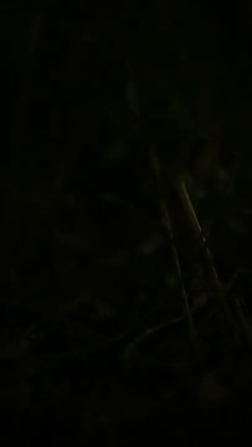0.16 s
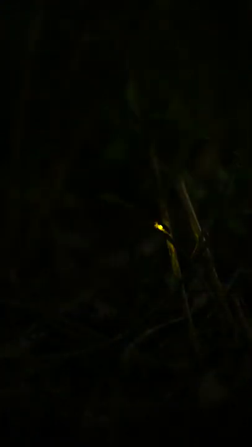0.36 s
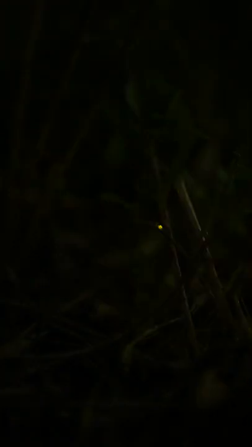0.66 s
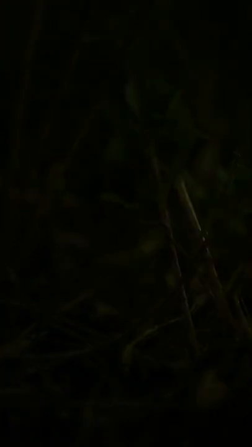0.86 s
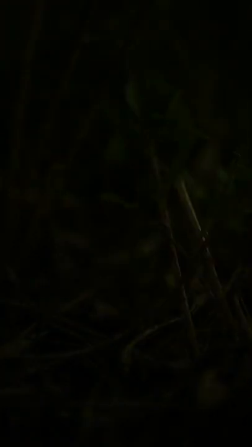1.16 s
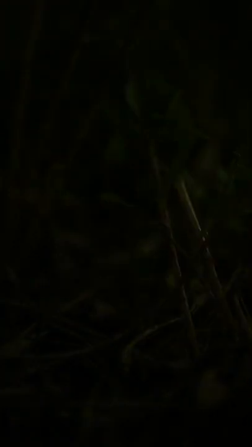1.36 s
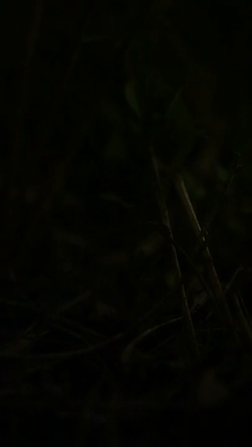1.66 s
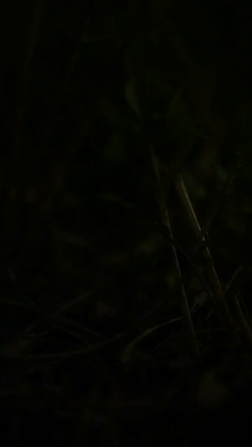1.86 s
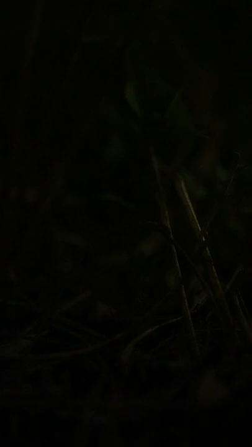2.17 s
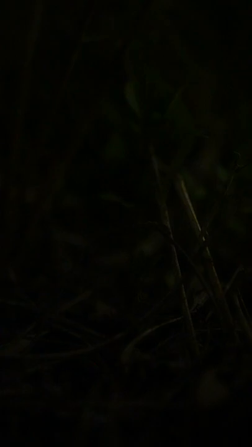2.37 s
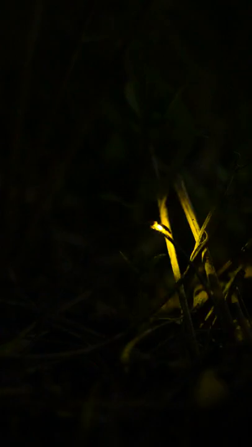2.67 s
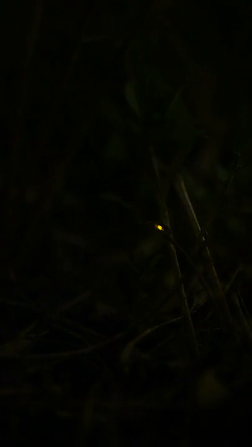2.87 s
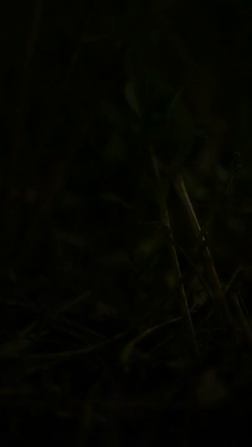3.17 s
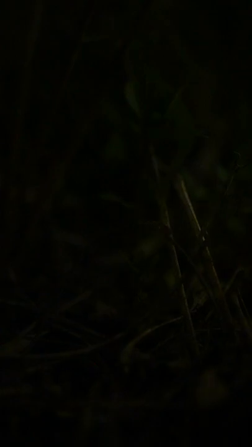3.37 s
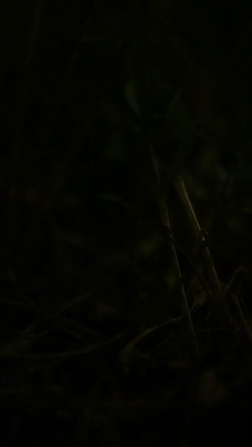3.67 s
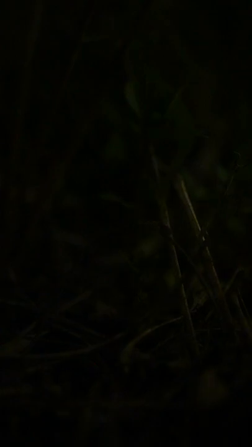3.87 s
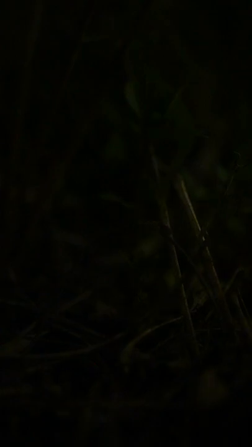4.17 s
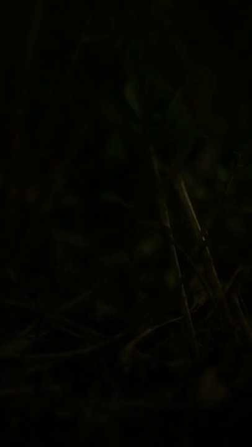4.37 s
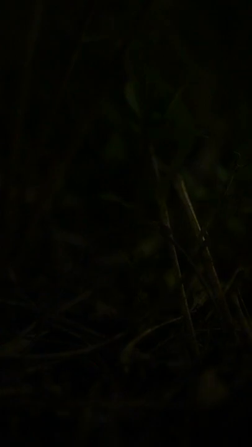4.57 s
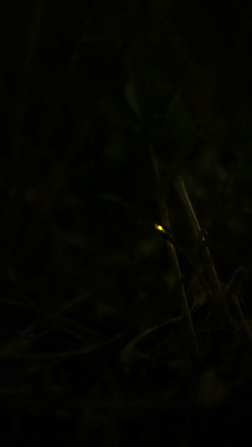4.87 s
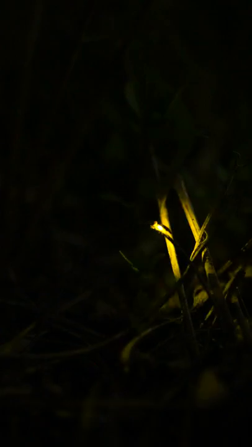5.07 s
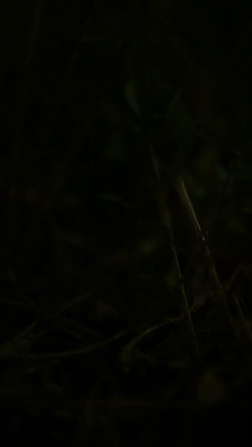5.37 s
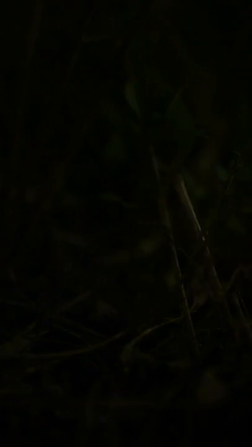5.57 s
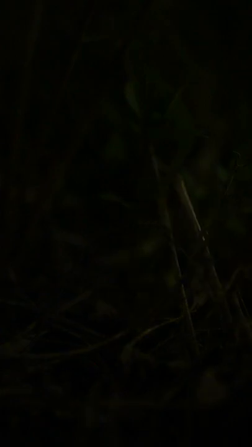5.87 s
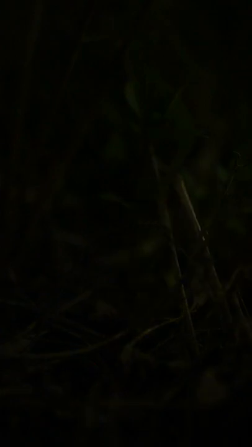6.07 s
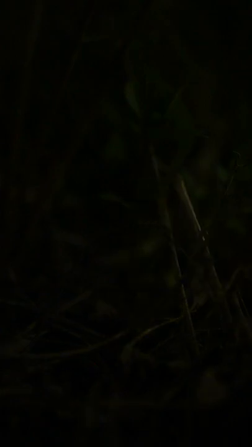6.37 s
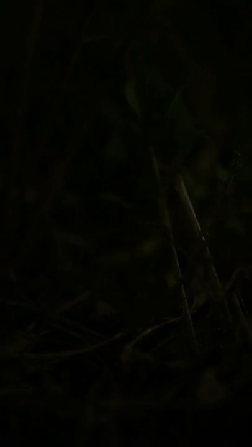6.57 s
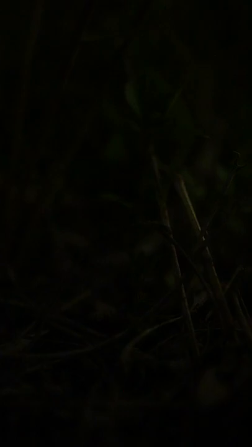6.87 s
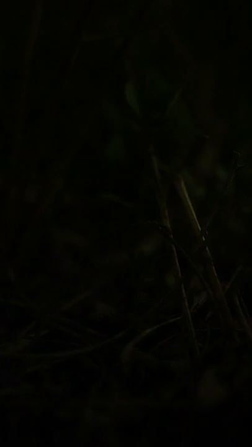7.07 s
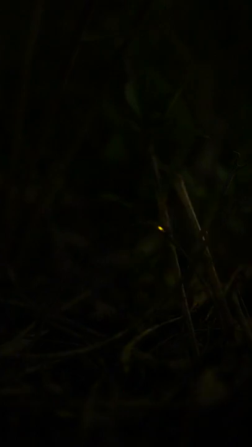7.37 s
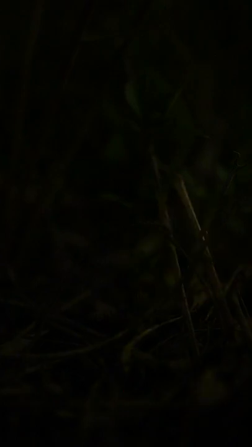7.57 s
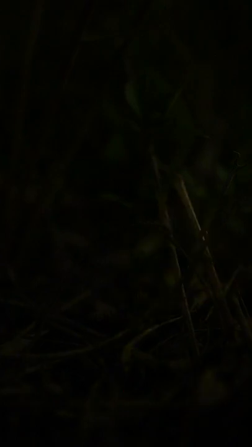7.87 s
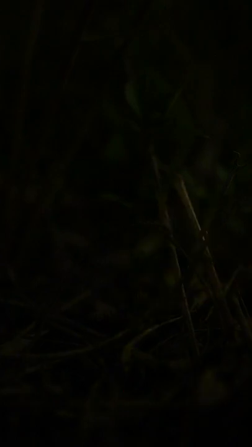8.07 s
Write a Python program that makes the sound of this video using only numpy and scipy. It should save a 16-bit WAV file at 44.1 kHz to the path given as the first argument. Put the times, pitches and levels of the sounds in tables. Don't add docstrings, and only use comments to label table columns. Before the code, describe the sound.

At the edge of a wet meadow at night, many small frogs call together. Near ones give rapid rising trills and short upward whistles, while distant ones blur into a continuous shimmering band. Far water hisses evenly beneath. A stem knocks low close to the microphone early on, an evenly repeated high whistle runs through the middle, and faint dry ticks come near the end. Open outdoor mono sound.

```python
import sys
import numpy as np
from scipy import signal
from scipy.fft import rfft, irfft, next_fast_len
from scipy.io import wavfile

SR = 44100
rng = np.random.default_rng(int(sys.argv[2]) if len(sys.argv) > 2 else 0)


def unload_wav(signal):
    wavfile.write(
        sys.argv[1],
        SR,
        np.round(np.clip(np.atleast_2d(signal).T, -1, 1) * 32767).astype(np.int16),
    )


def gain_from_decibels(decibels):
    exponent = np.asarray(decibels, float) / 20
    return 10 ** exponent


N = 362061

# frequency in Hz, density in dB per Hz.
WATER_COLOUR = [(25, -14.5), (50, -10), (100, -9), (200, -4), (500, -2), (800, 0.5), (1250, 1.5),
                (1700, -1.5), (2800, -4), (4000, -14.5), (6000, -24), (8000, -32), (11000, -36),
                (16000, -43.5)]
# time in seconds, level in dB.
FAR_LEVEL = [(0.0, -33), (0.41, -32.5), (0.89, -34), (1.37, -31), (2.24, -32.5), (2.93, -36), (3.61, -36.5),
             (4.09, -35.5), (4.75, -37), (5.0, -35.5), (5.4, -36.5), (6.0, -36), (6.63, -35.5),
             (7.2, -34.5), (7.84, -35.5), (8.21, -32.5)]
# last pulse in seconds, number of pulses, last pulse in Hz, peak in dB.
SLOW_TRILLS = [(.245, 2, 2170, -27), (.361, 4, 2060, -28), (1.054, 6, 2110, -23.5), (1.542, 6, 2170, -24),
               (1.64, 2.4, 2120, -25), (1.73, 2.2, 2000, -25), (1.932, 4.4, 2150, -22),
               (1.966, 3, 2296, -20), (2.57, 4.4, 2000, -26), (2.65, 4, 2220, -26), (2.66, 3, 1930, -28),
               (2.704, 3, 2450, -29), (3.5, 6, 2420, -37), (4.26, 2, 2480, -24), (4.715, 6.6, 2350, -26),
               (4.917, 1.9, 2280, -20), (4.967, 8.3, 2370, -27.5), (5.587, 8, 2200, -25.5),
               (5.663, 4, 2480, -29), (6.35, 2, 2230, -20.5), (6.774, 4, 2250, -20), (7.066, 2, 2140, -27),
               (7.577, 6.3, 2140, -24), (7.615, 4.2, 2290, -25), (8.058, 4.3, 2240, -25),
               (8.161, 2, 2010, -23)]
MIDDLE_TRILLS = [(.429, 3, 2410, -25), (.575, 7, 2090, -28.5), (.814, 2, 2140, -23.5),
                 (1.032, 6.6, 2480, -25), (1.165, 2, 2190, -21.5), (1.207, 1.8, 2230, -19),
                 (1.405, 2, 1960, -25), (1.6, 6.2, 2340, -21.5), (2.083, 2, 2280, -23),
                 (3.536, 4.8, 2460, -29), (4.258, 6, 2290, -27), (4.506, 3.6, 2500, -30),
                 (5.096, 10, 2280, -25.5), (5.251, 3.1, 2300, -21.5), (5.61, 3.7, 2290, -23),
                 (5.763, 9.1, 2460, -31), (5.964, 6.4, 2230, -23.5), (6.118, 5.5, 2150, -29.5),
                 (6.781, 5.6, 2200, -25), (7.397, 8.9, 2250, -28)]
FAST_TRILLS = [(.058, 4, 2280, -24), (.137, 2.8, 1940, -30), (.156, 4, 2450, -29), (.311, 2.9, 2360, -23.5),
               (.405, 2, 2650, -28), (.985, 2, 2660, -33), (.613, 2, 1970, -21), (1.397, 6, 2195, -27),
               (1.624, 3, 2120, -21.5), (1.884, 8, 2290, -23.5), (2.209, 2, 2070, -21),
               (2.917, 1.8, 2200, -22), (3.027, 3, 2355, -23), (4.208, 3.5, 2130, -24),
               (4.362, 8, 2250, -31), (4.58, 4, 2100, -28), (4.869, 4, 2170, -26.5), (5.226, 4, 2100, -25),
               (5.503, 8, 2240, -29.5), (6.334, 8.3, 2090, -27), (6.372, 8, 2160, -23.5),
               (6.771, 7.3, 2090, -28), (6.786, 7.1, 2150, -22.5), (6.822, 1.8, 2350, -22.5),
               (7.078, 4, 2380, -32), (7.123, 4, 1980, -25.5), (7.555, 2, 2200, -27),
               (7.75, 7.5, 2020, -30), (7.866, 3.4, 2020, -28), (7.972, 4.6, 2340, -24.5)]
# end in seconds, length in seconds, peak in dB.
LOW_WHISTLER = [(.232, .045, -24.5), (.874, .021, -26.5), (1.044, .033, -28), (1.145, .042, -29),
                (1.285, .096, -32.5), (1.665, .044, -31), (1.773, .03, -26), (1.894, .072, -24),
                (2.001, .041, -24), (2.127, .056, -23.5), (2.237, .025, -19), (2.357, .054, -23),
                (2.617, 0.045, -25), (2.693, 0.0493, -27), (2.736, .03, -27)]
HIGH_WHISTLER = [(1.987, .029, -27), (2.11, 0.025, -28), (2.226, .05, -31), (2.343, 0.053, -28),
                 (2.462, .033, -27), (2.583, .053, -27.5), (2.7, .063, -26), (2.818, .082, -26.5),
                 (2.936, 0.05, -25.5), (3.059, .05, -27), (3.177, .04, -27), (3.296, .04, -27),
                 (3.416, .04, -26.5), (3.53, .04, -27), (3.652, 0.036, -27), (3.774, 0.046, -26),
                 (3.895, 0.037, -26.5), (4.016, .045, -26.5), (4.135, 0.044, -26.5), (4.257, .04, -30),
                 (4.379, 0.034, -26.5), (4.504, 0.048, -26), (4.635, 0.033, -27)]
SINKING_WHISTLER = [
    (3.12, .045, -32),
    (3.234, .02, -29),
    (3.356, .028, -29.5),
    (3.477, 0.038, -26.5),
    (3.586, 0.016, -26.5),
    (3.695, .075, -32),
    (3.91, 0.045, -29),
]
LATE_WHISTLER = [(6.864, 0.094, -41), (6.954, .092, -32.5), (7.046, 0.097, -29), (7.178, 0.049, -36),
                 (7.285, 0.036, -32), (7.505, .019, -28.4), (7.613, .028, -32), (7.73, .06, -32),
                 (7.839, .04, -29), (7.952, 0.029, -28), (8.185, 0.078, -28)]
# end in seconds, length in seconds, end pitch in Hz, peak in dB.
LONE_WHISTLES = [(0.719, .045, 2110, -31), (.948, .065, 2200, -30), (1.006, .035, 2440, -32),
                 (1.008, .077, 2040, -32), (1.343, .031, 2200, -27.5), (1.759, .054, 2140, -23.5),
                 (2.383, .028, 2084, -24), (3.998, .038, 2270, -33.5), (4.085, .061, 2444, -35),
                 (5.906, .1, 2150, -26.5), (5.944, .07, 2030, -31), (6.156, .05, 2230, -30.5),
                 (6.746, .03, 2007, -24.5), (8.035, .065, 2000, -34), (8.094, .045, 1870, -34)]
# end in seconds, end pitch in Hz, peak in dB.
PEEPS = [(.289, 2300, -26), (.333, 2094, -28), (.686, 2103, -21.5), (1.203, 2096, -34), (2.403, 2200, -27),
         (2.494, 2120, -23), (2.633, 2050, -26), (2.715, 2094, -25), (2.901, 2340, -32), (3.048, 2200, -28),
         (3.153, 2236, -27), (3.251, 2160, -25), (3.271, 2265, -27), (3.743, 2220, -31), (4.115, 2210, -35),
         (4.693, 2170, -34), (5.995, 2140, -33), (6.307, 2010, -27), (6.329, 1952, -28), (6.364, 2055, -32),
         (6.516, 1995, -31), (7.01, 2040, -26), (7.722, 2034, -29), (8.203, 1990, -27)]
# delay in seconds, level in dB.
ECHOES = [
    (.007, -24.5),
    (.019, -28.5),
    (.034, -14),
    (.057, -20),
    (.091, -29),
]
# start in seconds, peak in dB, centre in Hz.
CLOSE_TICKS = [
    (1.003, -14, 257),
    (2.99, -36, 3000),
    (3.851, -25, 3200),
    (7.0274, -44, 7500),
    (7.8356, -47, 9300),
    (7.9189, -48, 10000),
    (8.192, -25, 3600),
]

PULSE_RISE_S, PULSE_FALL_S, PULSE_SAG_HZ_PER_S = 0.0041, 0.0045, 11800
BASE_CLIMB_HZ, STEP_HZ = 30, 39.5
FLICK_LEAD_S, FLICK_S, STOP_S = 0.005, 0.0022, 0.0064
OVERTONE_DB, TIP_DB_PER_KHZ = -33, 15
GLIDE_HZ_PER_S, LONGEST_GLIDE_HZ = 2750, 200.2


def add(track, start_s, sound):
    at = round(start_s * SR)
    first, last = max(at, 0), min(at + len(sound), N)
    if last > first:
        track[first:last] += sound[first - at:last - at]


def rms_one(x):
    return x / np.sqrt(np.mean(x ** 2) + 1e-20)


def water():
    size = next_fast_len(N)
    hz, db = np.transpose(WATER_COLOUR)
    bins_hz = np.maximum(np.arange(size // 2 + 1) * SR / size, 1)
    colour = gain_from_decibels(np.interp(np.log(bins_hz), np.log(hz), db))
    hiss = irfft(rfft(rng.standard_normal(size)) * colour, size)[:N]
    return gain_from_decibels(-37) * rms_one(hiss)


def voice(angle):
    return np.sin(angle) + gain_from_decibels(OVERTONE_DB) * np.sin(2 * angle)


def add_trill(track, last_s, pulses, rate_hz, first_hz, last_hz, db, chance):
    t = np.arange(-0.015, 0.018, 1 / SR)
    width_s = np.where(t < 0, PULSE_RISE_S, PULSE_FALL_S)
    shape = np.exp(-0.5 * (t / width_s) ** 2)
    count = round(pulses)
    for k in range(count):
        done = 1 - k / (count - 1)
        hz = first_hz + (last_hz - first_hz) * done + 13.5 * chance[k]
        cycles = hz * t - 0.5 * PULSE_SAG_HZ_PER_S * t ** 2
        tone = voice(2 * np.pi * cycles + 10 * chance[k + 10])
        add(track, last_s - k / rate_hz + t[0], gain_from_decibels(db) * (0.32 + 0.49 * done) * shape * tone)


def add_trill_rows(track, rows):
    for row, chance in zip(rows, rng.standard_normal((len(rows), 20))):
        add_trill(track, *row, chance)


def trill_rows(calls, rate_hz):
    rows = []
    for last_s, pulses, last_hz, db in calls:
        first_hz = last_hz - BASE_CLIMB_HZ - STEP_HZ * (pulses - 1)
        rows.append((last_s, pulses, rate_hz, first_hz, last_hz, db))
    return rows


def whistle(length, start_hz, end_hz, flick_hz, phase):
    t = np.arange(-length, STOP_S, 1 / SR)
    done = np.clip(1 + t / length, 0, 1)
    hook_hz = flick_hz / (1 + np.exp(-(t + FLICK_LEAD_S) / FLICK_S))
    hz = start_hz + (end_hz - start_hz) * done + hook_hz
    tip = gain_from_decibels(TIP_DB_PER_KHZ * (hook_hz - 0.5 * flick_hz) / 1000)
    stop = np.clip(1 - t / STOP_S, 0, 1)
    return np.sqrt(done) * tip * stop * voice(2 * np.pi * np.cumsum(hz) / SR + phase)


def add_whistle_rows(track, rows):
    for (end_s, length, *hz, db), phase in zip(rows, rng.uniform(0, 2 * np.pi, len(rows))):
        add(track, end_s - length, gain_from_decibels(db) * whistle(length, *hz, phase))


def whistle_rows(notes, end_hz, flick_hz, glide_hz_per_s=GLIDE_HZ_PER_S):
    end_s, length, db = np.transpose(notes)
    start_hz = end_hz - np.minimum(glide_hz_per_s * length, LONGEST_GLIDE_HZ)
    return np.transpose(np.broadcast_arrays(end_s, length, start_hz, end_hz, flick_hz, db))


def far_frogs(spread_hz, rise_hz, uneven_db, whistle_db, count):
    when, size, pace, distance = rng.random((count, 4)).T
    when = (np.arange(count) + 20 * when - 10) / count * (N / SR + 0.1)
    hz = 2092 + spread_hz * (rng.random((count, 2)).sum(axis=1) - 1)
    start_hz, end_hz = hz - rise_hz * size, hz + 0.5 * rise_hz * size
    db = -uneven_db * distance
    trills = np.transpose([when, 2 + 4 * size, 38 + 6 * pace, start_hz, end_hz, db])
    whistles = np.transpose([when, 0.03 + 0.05 * size, start_hz, end_hz, 150 * pace, db + whistle_db])
    track = np.zeros(N)
    add_trill_rows(track, trills[::2])
    add_whistle_rows(track, whistles[1::2])
    s, level_db = np.transpose(FAR_LEVEL)
    return gain_from_decibels(np.interp(np.arange(N) / SR, s, level_db)) * rms_one(track)


def high_whistler():
    since_s = np.array(HIGH_WHISTLER)[:, 0] - HIGH_WHISTLER[0][0]
    warm = np.minimum(since_s / 1.05, 1)
    end_hz = 2350 + 70 * np.sin(np.pi * warm)
    glide_hz_per_s = 1600 * warm + GLIDE_HZ_PER_S * (1 - warm)
    return whistle_rows(HIGH_WHISTLER, end_hz, 230 * warm, glide_hz_per_s)


def sinking_whistler():
    since_s = np.array(SINKING_WHISTLER)[:, 0] - SINKING_WHISTLER[0][0]
    return whistle_rows(SINKING_WHISTLER, 2340 - 145 * since_s, flick_hz=90)


def near_frogs():
    track = np.zeros(N)
    lone, peeps = np.array(LONE_WHISTLES), np.array(PEEPS)
    peep_notes = [(end_s, 0.021, db) for end_s, hz, db in PEEPS]
    long_flat_note = [(5.396, 0.13, -31.5)]
    add_trill_rows(track, trill_rows(SLOW_TRILLS, rate_hz=38.5) + trill_rows(MIDDLE_TRILLS, rate_hz=41)
                   + trill_rows(FAST_TRILLS, rate_hz=43.7))
    add_whistle_rows(track, np.concatenate([
        whistle_rows(LOW_WHISTLER, end_hz=2026, flick_hz=60),
        whistle_rows(peep_notes, peeps[:, 1], flick_hz=101),
        whistle_rows(lone[:, [0, 1, 3]], lone[:, 2], flick_hz=138),
        high_whistler(),
        sinking_whistler(),
        whistle_rows(long_flat_note, end_hz=2440, flick_hz=230, glide_hz_per_s=790),
        whistle_rows(LATE_WHISTLER, end_hz=2200, flick_hz=100)]))
    return track


def meadow(x):
    out = x.copy()
    for delay_s, db in ECHOES:
        add(out, delay_s, gain_from_decibels(db) * x)
    return out


def stems_and_drips(decay_s):
    track, t = np.zeros(N), np.arange(1200) / SR
    for (s, db, hz), burst in zip(CLOSE_TICKS, rng.standard_normal((len(CLOSE_TICKS), len(t)))):
        band = signal.butter(2, [0.8 * hz, 1.2 * hz], "band", fs=SR, output="sos")
        fade = np.exp(-t / max(decay_s, 2 / hz))
        add(track, s, signal.sosfilt(band, gain_from_decibels(db) * burst * fade))
    return track


def scene():
    far = far_frogs(spread_hz=270, rise_hz=120.4, uneven_db=2.5, whistle_db=-4.0, count=900)
    frogs = gain_from_decibels(-0.4) * meadow(near_frogs() + gain_from_decibels(-1.0) * far)
    return (frogs + water() + stems_and_drips(decay_s=0.002))[None]


def top_cut(x):
    return signal.sosfilt(signal.butter(12, 15640, fs=SR, output="sos"), x)


def record(dry):
    return top_cut(dry)


dry = scene()
out = record(dry)
unload_wav(out)
```